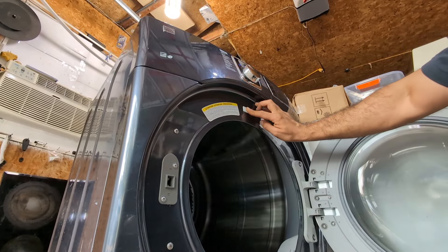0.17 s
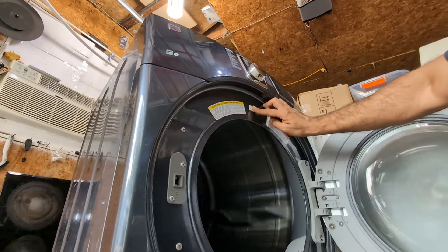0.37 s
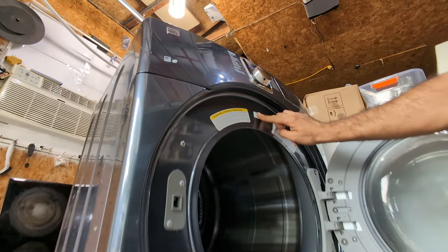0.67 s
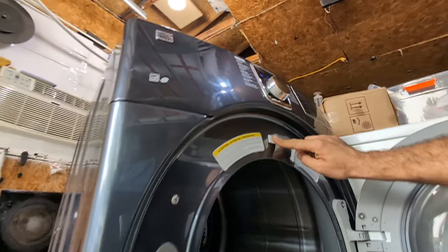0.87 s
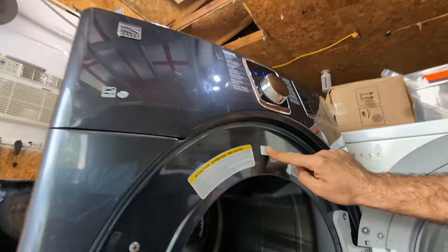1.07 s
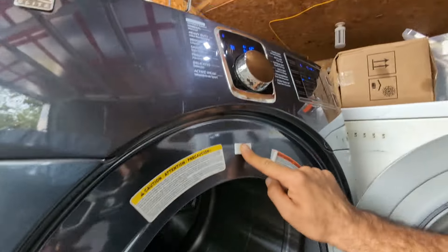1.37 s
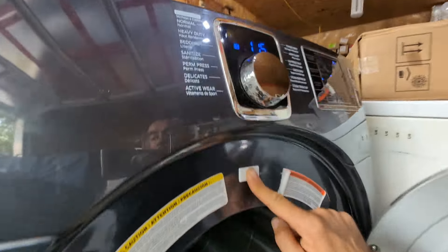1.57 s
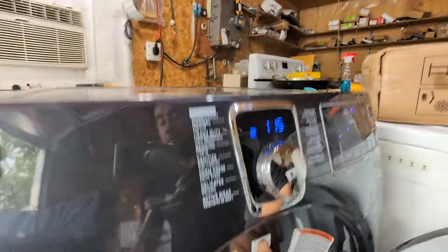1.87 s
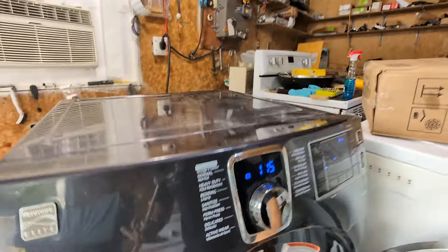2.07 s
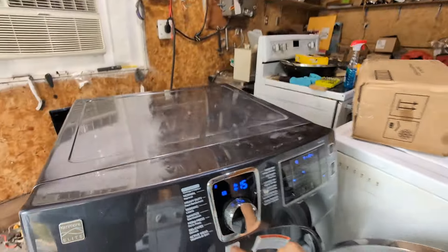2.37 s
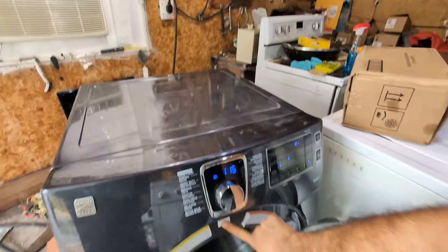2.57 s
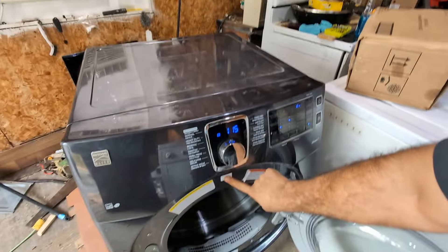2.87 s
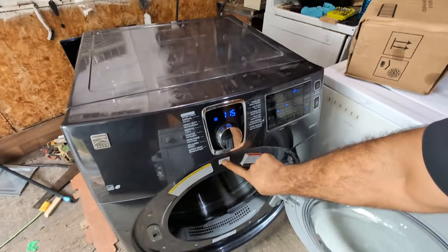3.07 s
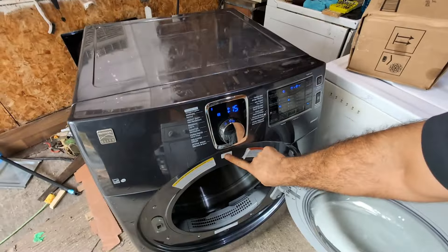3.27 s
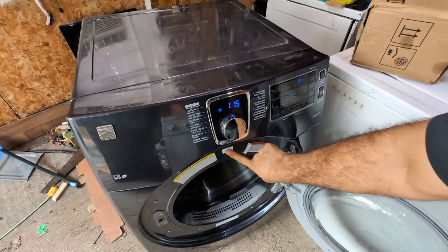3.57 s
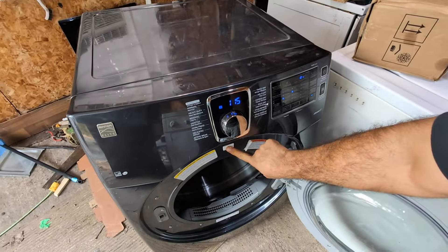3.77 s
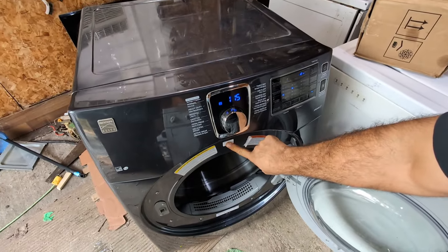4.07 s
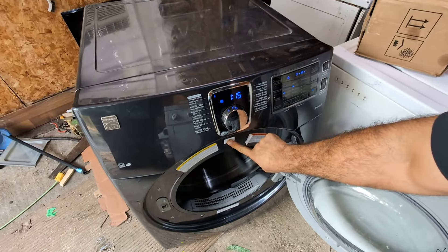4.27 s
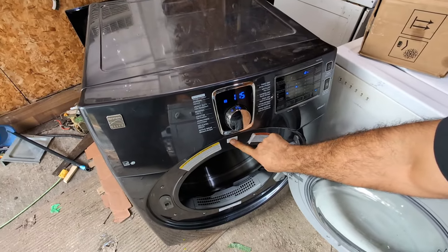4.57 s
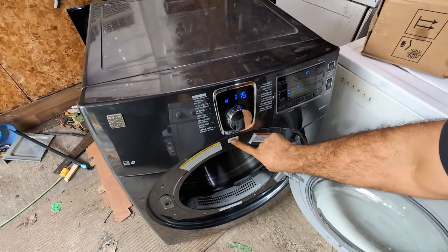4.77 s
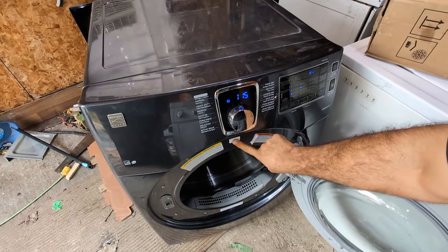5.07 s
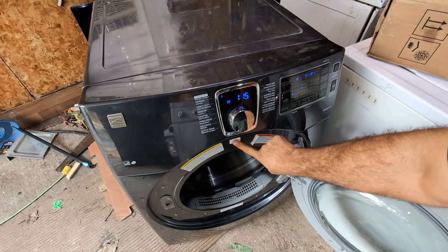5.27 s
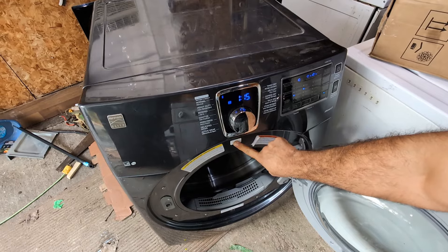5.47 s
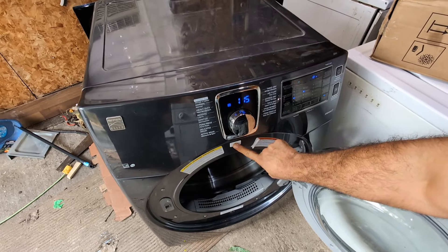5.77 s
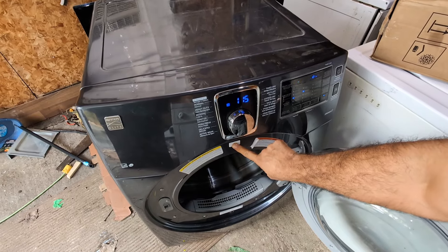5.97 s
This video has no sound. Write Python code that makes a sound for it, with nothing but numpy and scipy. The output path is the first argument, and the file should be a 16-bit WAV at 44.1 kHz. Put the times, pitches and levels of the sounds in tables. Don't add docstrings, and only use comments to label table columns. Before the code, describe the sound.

Handheld stereo microphone at the mouth of a running dryer: thick low hum, boomy air inside the drum, rollers pulsing about six times a second, and a felt seal rubbing faintly. Air hiss brightens around one and a half seconds, the whine swells near two, then dull footsteps on concrete back away and a softer, steadier duct roar and hum continue to the end.

```python
import sys
import numpy as np
from scipy import signal
from scipy.fft import rfft, irfft, next_fast_len
from scipy.io import wavfile
from scipy.ndimage import uniform_filter1d, map_coordinates

SR = 44100
rng = np.random.default_rng(int(sys.argv[2]) if len(sys.argv) > 2 else 0)


def ratio_of_db(decibels):
    return 10 ** (np.asarray(decibels, float) / 20)


def store_wav(level_fs):
    pcm = np.round(np.clip(np.atleast_2d(level_fs), -1, 1) * 32767)
    wavfile.write(sys.argv[1], SR, pcm.T.astype(np.int16))


N = 270333
TIME = np.arange(N) / SR
MAINS_HZ = 60.0
RUNNING_S = .0041
TURN_S, TURN_START_S = 1.225, -.075


def unit(x):
    return x / np.sqrt(np.mean(x ** 2) + 1e-20)


def along(points, hz):
    f, v = np.transpose(points)
    return np.interp(np.log(hz + 1), np.log(f + 1), v)


def curves(rows):
    s, *cols = np.transpose(rows)
    return [np.interp(TIME, s, c) for c in cols]


def wobble(rate):
    knots = rng.standard_normal(int(N * rate / SR) + 4)
    return map_coordinates(knots, [TIME * rate])


def resonant(modes):
    def gain(hz):
        return np.sqrt(sum(ratio_of_db(2 * db) / (1 + (2 * (hz - c) / w) ** 2) ** 2 for c, w, db in modes))
    return gain


# pitch_hz, likeness (1 = the same, 0 = unrelated)
PORT_LIKENESS = [(30, 5), (60, 4), (130, 1.7), (230, 1), (400, 0.83), (640, 0.53), (1410, 0.06), (3100, 0),
                 (6800, -0.16), (15000, 0)]
# pitch_hz, left_over_right_db
PORT_TILT = [(60, -1.5), (110, -0.5), (200, -0.5), (380, -1.5), (700, 0), (1290, -0.5), (2380, 0.0),
             (4400, 0.0), (8120, 1), (15000, 0)]


def rush(gain, patchy_db):
    cells = signal.stft(rng.standard_normal((2, N)), nperseg=512)[2]
    field = uniform_filter1d(rng.standard_normal(cells.shape[1:]), size=8, axis=0)
    field = uniform_filter1d(field, size=16, axis=1)
    pair = signal.istft(cells * ratio_of_db(patchy_db * unit(field)), nperseg=512)[1]
    size = next_fast_len(N + 8192)
    hz = np.fft.rfftfreq(size, 1 / SR)
    angle = np.arccos(np.clip(along(PORT_LIKENESS, hz), -1, 1)) / 2
    mid, side = rfft(pair, size) * gain(hz) * [np.cos(angle), np.sin(angle)]
    tilt = ratio_of_db(along(PORT_TILT, hz) / 2)
    return unit(irfft([(mid + side) * tilt, (mid - side) / tilt], size)[:, :N])


def tone(hz, db, pan_db, drift, flutter_db):
    wave = np.sqrt(2) * np.sin(2 * np.pi * hz * (TIME - RUNNING_S) + drift * wobble(4.83))
    pan = np.outer([.5, -.5], np.ones(N)) * pan_db
    return ratio_of_db(db + flutter_db * wobble(7) + pan) * wave


# start_s, distance_m
CAMERA = [
    (0, .2),
    (0.78, 0.22),
    (1.22, .28),
    (1.64, 0.33),
    (2.38, 0.77),
    (2.79, 1.05),
    (3.0, 0.94),
    (6.13, 1.11),
]
HUM_DB, THIRD_DB, FOURTH_DB = -30.5, -42, -62.5
THIRD_FADES, FOURTH_FADES = -.25, 1.02


def motor():
    near_db = -20 * np.log10(curves(CAMERA)[0])
    first_db = HUM_DB + near_db
    pull_hz = 2 * MAINS_HZ
    hum = tone(pull_hz, first_db, pan_db=-1.2, drift=.04, flutter_db=.3)
    hum += tone(2 * pull_hz, first_db - 34, pan_db=-.3, drift=.3, flutter_db=1.5)
    hum += tone(3 * pull_hz, THIRD_DB + THIRD_FADES * near_db, pan_db=-1.3, drift=0.039, flutter_db=1.2)
    hum += tone(4 * pull_hz, FOURTH_DB + FOURTH_FADES * near_db, pan_db=-.8, drift=.08, flutter_db=.8)
    return hum


# start_s, level_db, left_over_right_db
BLADE = [(0, -47.5, -6), (0.7, -55, -12), (0.9, -48, 3), (1.25, -51, 1), (1.46, -68, 1.5), (1.57, -47, 1),
         (1.76, -41.5, 1), (2.0, -40.5, 0), (2.22, -45, 6), (2.4, -50, 1), (2.65, -57, -21),
         (2.78, -49.5, -10.5), (3.95, -53, -14), (4.24, -48, -5), (4.88, -46.5, -8), (5.2, -52, -14),
         (6.13, -47, -7.5)]
# pitch_hz, width_hz, level_db
BESIDE_BLADE = [(603.3, 17, 8), (628.4, 17, 0.5)]
BLADE_HZ = 576.9
RING_DB, RING_SWAY_DB = -50.5, 1.3


def blower():
    level_db, pan_db = curves(BLADE)
    whine = tone(BLADE_HZ, level_db, pan_db, drift=.12, flutter_db=.7)
    octave = tone(2 * BLADE_HZ, -69.0, pan_db=6.0, drift=0.25, flutter_db=5.0)
    ring_db = RING_DB + RING_SWAY_DB * wobble(4.5)
    ring_pan_db = np.outer([.3, -.3], pan_db - 0.5)
    ring = ratio_of_db(ring_db + ring_pan_db) * rush(resonant(BESIDE_BLADE), patchy_db=-3.0)
    return whine + ring + octave


# start_s, share (0-1)
MOUTH = [
    (0, 0.96),
    (.75, 1),
    (1.7, 0.78),
    (2.2, 0),
    (2.7, 0.16),
    (6.13, 0.02),
]
# pitch_hz, width_hz, level_db
DRUM = [(59, 6.5, -9.5), (78.5, 52, -0.5), (92.7, 24, 3.5)]
# peak_s, peak_db, length_s
SING = [(0.18, -38.4, 0.27), (0.52, -34.5, 0.16), (0.63, -34.5, 0.086), (0.77, -41, 0.11), (0.87, -33, .1),
        (0.99, -32, 0.1), (1.08, -28.5, 0.079), (1.18, -33.5, 0.18), (1.29, -36, .09), (1.5, -35.5, 0.16),
        (1.61, -34.5, 0.12), (1.73, -37, 0.14), (2.09, -48, 0.14), (3.15, -35, 0.31), (3.59, -38.5, .2),
        (3.78, -39, 0.33), (4.04, -38, 0.15), (4.22, -38, .14), (4.39, -43, 0.21), (4.62, -43.5, .37),
        (4.95, -38, 0.44), (5.21, -42, .21), (5.62, -39, 0.49)]
BOOM_HZ, BOOM_SPREAD_HZ = 83.7, 2.8
SING_NEAR_HZ, SING_FAR_HZ, SING_SPREAD_HZ = 252, 215.6, 7


def drum():
    mouth = np.clip(curves(MOUTH)[0], 0, 1)
    bed = ratio_of_db(-39.5 + 7.8 * mouth) * rush(resonant(DRUM), patchy_db=0.0)
    grip = ratio_of_db(-60) * rush(resonant([(32, 16, 0)]), patchy_db=2.2)
    grip = np.array([grip[0], grip[1, ::-1]])
    boom = throbs(rollers(), np.full(N, BOOM_HZ), BOOM_SPREAD_HZ, rough=2.8, glide=60)
    nearness = np.clip(1.23 * mouth - .15, 0, 1)
    sing_hz = SING_FAR_HZ + (SING_NEAR_HZ - SING_FAR_HZ) * nearness
    sing = throbs(SING, sing_hz, SING_SPREAD_HZ, rough=3.0, glide=150)
    return ratio_of_db(-2.5) * boom + ratio_of_db(-3.0) * sing + bed + ratio_of_db(-6.0) * grip


# turn_s, load_db
LOAD = [
    (0, 2.5),
    (.2, 3),
    (.4, -3.5),
    (.52, -2.5),
    (.66, 1.5),
    (.85, -4),
    (1.0, -1),
    (1.13, 4.5),
]
ROLLER_S, ROLLER_START_S = .158, .172
ROLLER_DB, ROLLER_FADES, ROLLER_SCATTER_DB, ROLLER_LENGTH_S = -32, 0.57, 1.3, .12


def rollers():
    s = np.arange(ROLLER_START_S, N / SR, ROLLER_S)
    near_db = -20 * np.log10(curves(CAMERA)[0][(s * SR).astype(int)])
    load_db = np.interp((s - TURN_START_S) % TURN_S, *np.transpose(LOAD), period=TURN_S)
    scatter_db = ROLLER_SCATTER_DB * rng.standard_normal(len(s))
    db = ROLLER_DB + ROLLER_FADES * near_db + load_db + scatter_db
    return np.transpose([s, db, np.full(len(s), ROLLER_LENGTH_S)])


def throbs(rows, centre_hz, spread_hz, rough, glide):
    out = np.zeros((2, N + SR))
    t = TIME[:SR // 2] - 1 / 4
    start = rng.uniform(0, 2 * np.pi, (len(rows), 3))
    for (s, db, length), (phase, skew, off) in zip(rows, start):
        hz = centre_hz[round(s * SR)] + np.sqrt(2) * spread_hz * np.sin(off)
        swell = np.exp(-(t / (0.35 * length)) ** 2)
        sides = 0.081 * np.sin(skew) * np.array([[1], [-1]])
        bend = np.pi * glide * np.cos(skew) * t ** 2
        wave = np.sin(2 * np.pi * hz * t + bend + phase + sides)
        out[:, round(s * SR):][:, :len(t)] += np.sqrt(2) * ratio_of_db(db) * swell * wave
    lean_db = np.array([[-.55], [.55]])
    return out[:, SR // 4:][:, :N] * ratio_of_db(rough * wobble(35) + lean_db)


# pitch_hz, width_hz, level_db
DUCT_NEAR = [(143, 45, -2), (186, 26, -6.5), (249.3, 70, -3), (299, 30, -7.5), (372, 74, -6.5),
             (381, 23, -3), (456.6, 39, -9), (508, 18, -21), (586, 36, -14), (900, 82, -18.5)]
DUCT_FAR = [(151.7, 27, 0), (173, 18.5, -0.5), (215.6, 52, -3.5), (262.4, 54, -7), (325, 39, -7),
            (389.2, 32, -2.5), (459, 70, -8.5), (522, 25, -15), (570, 59, -14.5), (1170, 53, -30)]
# pitch_hz, level_db (per Hz)
HISS = [(380, -17), (640, -8.5), (664, -13), (816, -10), (1020, -12.5), (1150, -11.5), (1530, -15.5),
        (2630, -15), (6000, -22), (7800, -32.5), (13200, -120)]
FIZZ = [(2400, -20), (4000, -26), (5800, -2), (7000, -0.5), (9000, 1), (10200, 0), (11000, -10),
        (12000, -56)]
SIZZLE = [(9000, -57), (10000, -16), (10600, 0.5), (11500, 3.5), (13000, 0.5), (14800, 0.5), (16500, -7.5)]
# start_s, strength_db
DRAUGHT = [(0, 1.5), (.42, 3), (.55, 2), (.95, 2.5), (1.3, 3.8), (1.68, 4), (1.8, 2.5), (2.2, 1), (2.7, 0),
           (3.2, -0.05), (4.4, 0), (6.13, -0.5)]
# turn_s, width_s, rub_db
RUB = [
    (0.02, .15, 3.2),
    (.49, .15, 2.6),
    (1.245, .12, 3.2),
]
ROAR_DB, HISS_DB, FIZZ_DB, SIZZLE_DB = -38.5, -45.5, -54.5, -53.5
ROAR_FOLLOWS, HISS_FOLLOWS, FIZZ_FOLLOWS, SIZZLE_FOLLOWS = .45, 0.86, 1, 1.1
HISS_RUB, FIZZ_RUB = 0.089, 0.65


def air():
    draught_db, = curves(DRAUGHT)
    turn_s = (TIME - TURN_START_S) % TURN_S
    rub_db = sum(db * np.exp(-((turn_s - s) / width) ** 2) for s, width, db in RUB)
    mouth = np.clip(curves(MOUTH)[0], 0, 1)
    near = np.sqrt(mouth) * rush(resonant(DUCT_NEAR), patchy_db=1.0)
    far = np.sqrt(1 - mouth) * rush(resonant(DUCT_FAR), patchy_db=-0.8)
    roar = ratio_of_db(ROAR_DB + ROAR_FOLLOWS * draught_db + 0.8 * wobble(8)) * (near + far)
    hiss_db = HISS_DB + HISS_FOLLOWS * draught_db + HISS_RUB * rub_db
    hiss = ratio_of_db(hiss_db) * rush(lambda hz: ratio_of_db(along(HISS, hz)), patchy_db=0.6)
    gust_db = 0.3 * wobble(7.6)
    fizz_db = FIZZ_DB + FIZZ_FOLLOWS * draught_db + FIZZ_RUB * rub_db + gust_db
    fizz = ratio_of_db(fizz_db) * rush(lambda hz: ratio_of_db(along(FIZZ, hz)), patchy_db=1.1)
    sizzle_db = SIZZLE_DB + SIZZLE_FOLLOWS * draught_db + rub_db + gust_db
    sizzle = ratio_of_db(sizzle_db) * rush(lambda hz: ratio_of_db(along(SIZZLE, hz)), patchy_db=1.3)
    return roar + hiss + fizz + sizzle


# start_s, peak_db, pitch_hz
STEPS = [
    (.86, -35, 1110),
    (1.33, -35.5, 1750),
    (1.48, -39, 1300),
    (1.51, -39, 900),
    (1.64, -44, 2300),
    (2.385, -28, 474),
    (2.42, -38, 1000),
    (2.55, -41, 1303),
    (2.669, -34.5, 680),
    (2.725, -39.5, 1307),
]


def steps():
    out = np.zeros((2, N + SR))
    t = TIME[:SR // 5]
    for s, db, hz in STEPS:
        band = signal.butter(2, [hz * .75 / SR * 2, hz * 1.35 / SR * 2], "band")
        puff = signal.lfilter(*band, rng.standard_normal((2, len(t))))
        swell = ratio_of_db(-60 * t / 0.21) * (1 - np.exp(-t / 0.0069))
        out[:, round(s * SR):][:, :len(t)] += ratio_of_db(db - 3.5) * swell * unit(puff)
    return out[:, :N]


def scene():
    return motor() + blower() + drum() + air() + steps()


def band_limit(x):
    return signal.sosfilt(signal.butter(12, 15750, fs=SR, output="sos"), x)


def record(dry):
    cycle = round(SR / MAINS_HZ)
    settled = np.concatenate([np.tile(dry[:, :cycle], 3), dry], axis=1)
    bass_cut = signal.butter(3, 46, "high", fs=SR, output="sos")
    mix = signal.sosfilt(bass_cut, settled)[:, -N:]
    return band_limit(mix)


dry = scene()
out = record(dry)
store_wav(out)
```